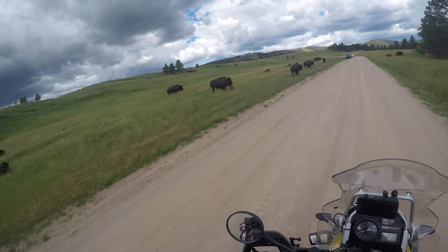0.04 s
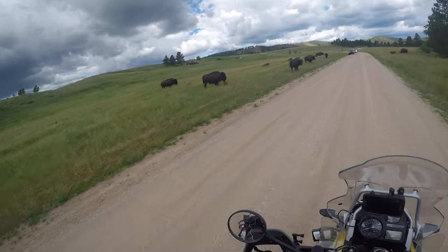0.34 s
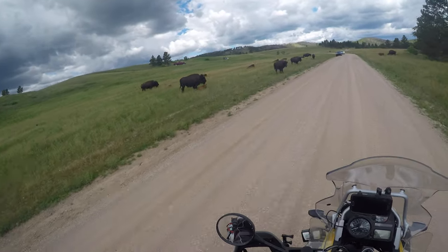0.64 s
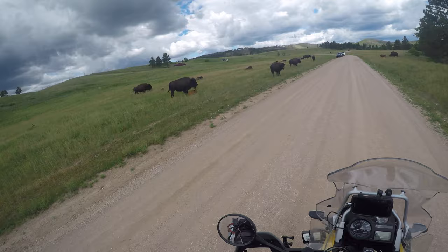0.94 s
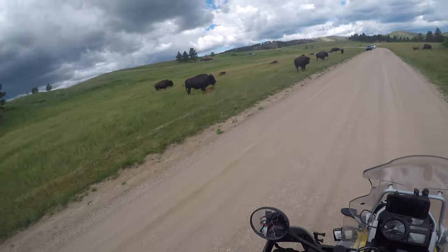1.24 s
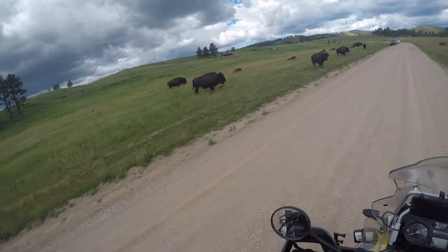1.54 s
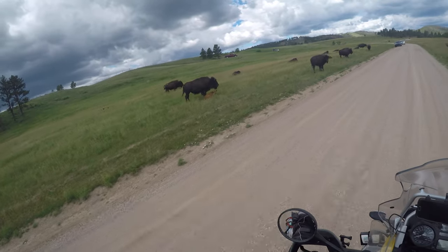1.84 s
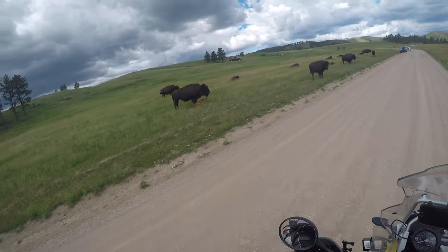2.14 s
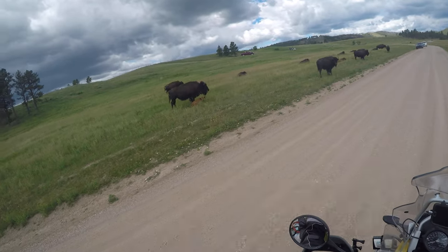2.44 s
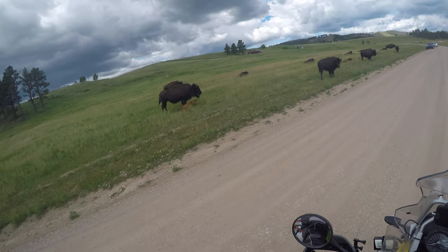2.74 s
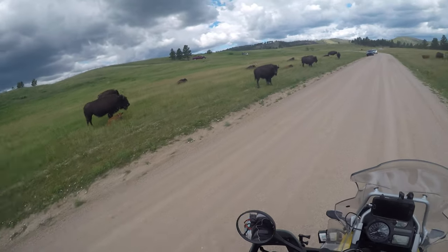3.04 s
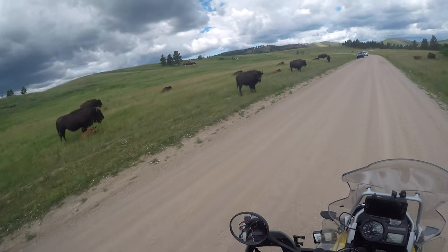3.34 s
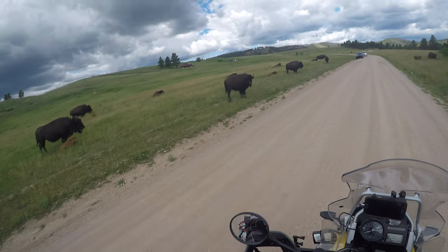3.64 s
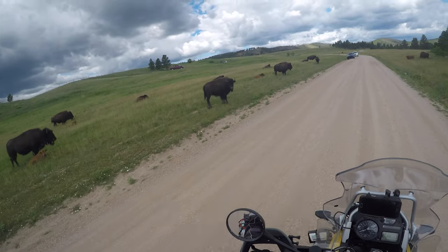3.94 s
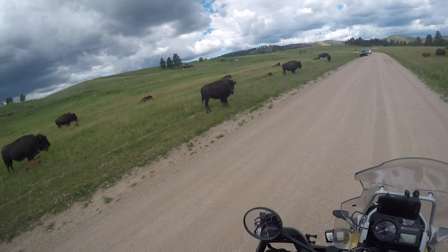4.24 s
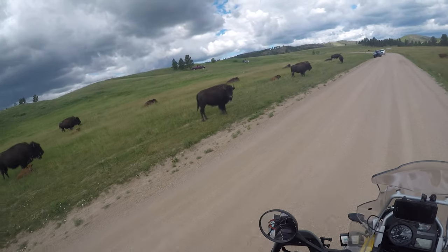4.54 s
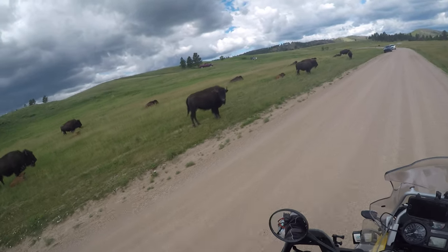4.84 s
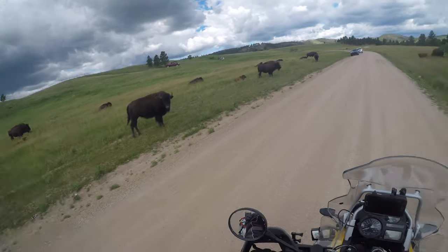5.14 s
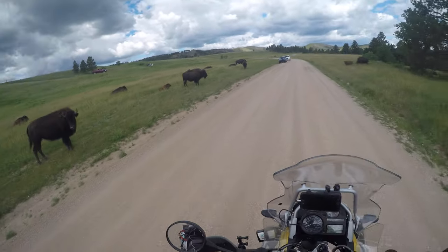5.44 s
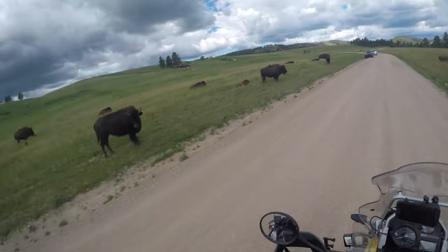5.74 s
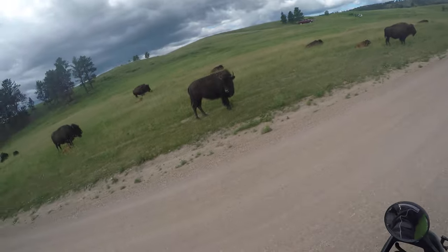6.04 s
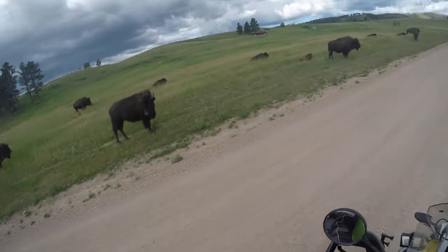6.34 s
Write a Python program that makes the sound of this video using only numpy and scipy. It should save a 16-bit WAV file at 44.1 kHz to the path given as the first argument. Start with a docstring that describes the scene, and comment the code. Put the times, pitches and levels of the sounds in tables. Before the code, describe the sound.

A twin-cylinder motorcycle rides along a gravel road at low revs, heard close from the rider's position for about six and a half seconds. Its exhaust throbs and chuffs throughout, slowly falling in pitch, with a low shudder and thin, slightly ringing valve clatter. A faint gear whine fades by 3 seconds. Low wind buffets the microphone, easing as the bike slows, with gusts at the start and near 2, 3 and 6 seconds. Around 0.7 to 1.1 seconds the tyres crunch over loose gravel and metal parts buzz and chatter; this returns from 3 to 3.8 seconds and around 5.4. A deep bump thuds at 2 seconds. Stray stones tick against the bike near 1.3, 3, 4.8 and 5.2 seconds. From 5.7 to 6.4 seconds a flurry of stone hits and knocks sounds over the still-running engine.

```python
"""A twin-cylinder motorcycle rolls down a gravel road at low revs, slowly losing speed. From the start
the exhaust throbs and chuffs, valves clatter, gears whine faintly, the bike shudders and air buffets
the rider's camera, whose case rings in the mids and treble. Within a second the tyres crunch into the
first patch of loose gravel and set buzzing metal parts chattering. A bump thuds at 2 s, stray stones
knock against the bike, and near 6 s a stony stretch brings a flurry of hits."""
import sys
import numpy as np
from scipy import signal
from scipy.fft import rfft, irfft
from scipy.io import wavfile

SR = 44100
rng = np.random.default_rng(int(sys.argv[2]) if len(sys.argv) > 2 else 0)


def dump(signal):
    """Clip the signal to [-1, 1] and save it as 16-bit WAV at the path in sys.argv[1]."""
    limited = np.clip(np.atleast_2d(signal).T, -1, 1)
    pcm = np.round(limited * 32767).astype(np.int16)
    wavfile.write(sys.argv[1], SR, pcm)


N = 286209
TIME, HZ = np.arange(N) / SR, np.fft.rfftfreq(N, 1 / SR)
CRUISE_CYCLES_PER_S = 13

# The engine winding down. Each row: time in seconds, four-stroke cycles per second.
ENGINE_SPEED = [(0.0, 14.258), (0.5, 14.093), (1.0, 13.863), (1.5, 13.475), (2.0, 13.198), (2.5, 12.922),
                (3.0, 12.596), (3.5, 12.293), (4.0, 12.019), (4.5, 11.939), (5.0, 11.881), (5.5, 11.752),
                (6.0, 11.726), (6.49, 11.623)]
# The voice of the exhaust pipes. Each row: frequency in Hz, relative level of a harmonic there in dB.
PIPE_RESPONSE = [(12, -61.5), (28, -48), (49, -34), (72, -49), (84, -45.5), (97, -37.5), (112, -40),
                 (121, -48), (140, -65.5), (165, -90.5), (195, -66.5), (225, -56.5), (258, -63.5),
                 (330, -74.5)]
# Engine load pushing the exhaust's drone and bark. Each row: time in seconds, lift in dB.
ENGINE_LOAD = [(0, 0.5), (4.6, -0.5), (5.3, 0.6), (6.49, 1.5)]
# Brief dips in the low end. Each row: middle in seconds, length in seconds, depth in dB.
BASS_SAGS = [(1.375, 0.55, 10), (3.58, 0.51, 15), (3.978, .16, 30), (5.737, 0.25, 6)]
# The valve rhythm. Each row: place in the cycle from 0 to 1, half-width in cycles, relative level in dB.
VALVE_BEATS = [(0.96, 0.092, -1), (0.28, 0.097, -1.5), (0.43, 0.095, -7), (0.78, 0.072, -3.5)]
# The tone of the valve clatter. Each row: frequency in Hz, relative level in dB.
CLATTER_EQ = [(100, -43), (230, 20.5), (400, 5.5), (700, 0.5), (1200, 3), (2300, 3.5), (3400, 0.5),
              (6000, -7), (8500, -6.5), (15000, -14.5)]
# Resonances of the camera case. Each row: frequency in Hz, width in Hz, boost in dB.
CASE_RESONANCES = [(434.5, 58, 5.5), (939, 256, 10), (1223, 41, 6), (1470, 440, 5.5), (2063, 64, 5),
                   (2655, 460, 2.5), (2894, 173, 7), (2984, 24, 12.5), (3596, 360, 5), (3830, 130, 3),
                   (4196, 104, 9), (4493, 586, 12.5), (4807, 150, 9.5), (5437, 990, 10.5), (6000, 172, 6),
                   (6500, 140, 8), (6866, 230, 9), (7290, 690, 5.5), (8015, 140, 3.5), (9410, 340, 9.5),
                   (10160, 120, 8.5), (10230, 1170, 7.5), (11610, 820, 9.5), (12413, 739, 7),
                   (13700, 160, 9), (14600, 620, 10)]
# The rider looks aside and the clatter brightens. Each row: middle and length in seconds, lift in dB.
RIDER_GLANCES = [(2.15, 1.6, 1), (6.25, .9, 1.2)]
# The fade of the gear whine. Each row: time in seconds, relative level in dB.
WHINE_FADE = [(0, -63.5), (1.5, -62.5), (2.8, -74), (6.49, -77)]
# The tone of air on the microphone. Each row: frequency in Hz, relative level in dB.
WIND_EQ = [(5, -18), (12, -22), (18, -1), (27, -4.5), (37, -3.5), (55, -4.5), (75, -20.5), (120, -29.5),
           (200, -38), (400, -72), (1000, -84)]
# Gusts on the microphone. Each row: middle in seconds, length in seconds, level in dB.
WIND_GUSTS = [(0.105, 0.36, -34), (.95, 0.4, -40), (2.04, 0.23, -28.5), (3.108, 0.19, -34),
              (5.3, 0.31, -49), (6.068, .22, -32)]
# The tone of the tyres' dull roar. Each row: frequency in Hz, relative level in dB.
ROAR_EQ = [(40, -20), (90, 21), (160, 14.5), (260, 9.5), (350, -0.5), (600, 1.5), (1000, -8.5), (1600, -16),
           (3000, -20), (8000, -70)]
# The tone of the gravel's crunch. Each row: frequency in Hz, relative level in dB.
CRUNCH_EQ = [(300, -13.5), (900, -13.5), (1400, -4), (1800, 2), (2300, -4.5), (3200, -12), (5000, -27),
             (12000, -42)]
# Loose gravel. Each row: middle and length in seconds, relative levels of roar and of crunch in dB.
GRAVEL_PATCHES = [(.73, 0.31, -60.5, -59), (1.067, 0.34, -61.5, -57.5), (2.144, 0.4, -56.5, -67),
                  (2.99, 0.22, -56, -54.5), (3.257, 0.3, -55, -61.5), (3.758, 0.1, -57.5, -60),
                  (4.517, 0.17, -65, -61.5), (5.42, 0.37, -55.5, -59), (5.83, 0.39, -55, -71)]
# The ring of three loose metal parts. Each row: pitch in Hz, width in Hz.
PART_RINGS = [(1675, 108), (2660, 117), (2900, 330)]
# Where each part buzzes most. Each row: engine speed and reach in cycles per second, relative level in dB.
PART_BUZZ = [(12.87, 0.64, -61), (14.3, 0.92, -61), (12.1, 0.21, -60)]
# The road jolts a part. Each row: middle and length in seconds, part from 0 to 2, relative level in dB.
PART_CHATTERS = [(0.772, 0.17, 0, -55), (1.036, .12, 0, -57), (1.57, 0.11, 0, -63), (2.954, 0.19, 0, -56.5),
                 (3.23, 0.14, 0, -60), (3.752, 0.062, 0, -55), (5.416, .3, 0, -65), (5.46, 0.37, 1, -59),
                 (3.2, 0.44, 2, -63.5), (5.44, 0.33, 2, -63.5)]
# Bumps and stone hits. Each row: start in seconds, relative level in dB, pitch in Hz, ring width in Hz.
HITS = [(1.282, -36, 2050, 320), (1.95, -34, 239, 88), (1.981, -27.5, 234, 75), (1.981, -11, 52.2, 9.1),
        (3.019, -38, 1740, 160), (3.207, -35, 1740, 500), (4.762, -39.5, 2090, 640),
        (5.194, -38, 1820, 900), (5.752, -39, 970, 120), (5.78, -39, 950, 220), (5.849, -28, 1390, 1300),
        (5.866, -28, 210, 104), (5.891, -35, 1200, 1900), (5.916, -26.5, 181, 72), (5.959, -32.5, 990, 450),
        (5.992, -30, 800, 1700), (6.055, -24, 1090, 2800), (6.091, -29.5, 168, 52), (6.135, -43.5, 490, 56),
        (6.364, -35.5, 2180, 540)]


def amp(db):
    """Decibels to gain."""
    return 10 ** (np.asarray(db) / 20)


def unit(x):
    """Scales to rms 1."""
    return x / np.sqrt(np.mean(x ** 2) + 1e-20)


def curve(rows):
    """Draws a time table out to every sample."""
    return np.interp(TIME, *np.transpose(rows))


def eq_db(points):
    """Draws a tone table out to dB at every frequency."""
    hz, db = np.transpose(points)
    return np.interp(np.log(HZ + 1), np.log(hz + 1), db)


def shaped(x, db, band_hz):
    """Filters x by a dB curve, scaled to rms 1 within the band."""
    spectrum = rfft(x) * amp(db)
    inside = spectrum[(HZ > band_hz[0]) & (HZ < band_hz[1])]
    return irfft(spectrum, N) * N / np.sqrt(2 * np.sum(abs(inside) ** 2))


def wander(rate_hz):
    """Smooth random drift of rms 1."""
    return unit(irfft(rfft(rng.standard_normal(N)) * np.exp(-(HZ / rate_hz) ** 2), N))


def grains(per_s, spread_db):
    """Random clicks, mostly small and a few large."""
    size = amp(spread_db * np.minimum(rng.exponential(1, N), 4))
    return unit(size * rng.choice([-1, 1], N) * (rng.random(N) < per_s / SR))


def ring(x, hz, width_hz):
    """A steep resonance, scaled to rms 1."""
    pole = np.exp((2j * np.pi * hz - np.pi * width_hz) / SR)
    return unit(signal.lfilter([1], np.poly([pole, pole]), x).real)


def swell(middle, length):
    """Rises, holds and falls around a moment."""
    return np.exp(-abs(2 * (TIME - middle) / length) ** 3)


def swelling(bed_db, events):
    """Gain of a steady bed plus (middle, length, dB) swells, summed in power."""
    swell_power = sum(amp(db) ** 2 * swell(middle, length) for middle, length, db in events)
    return np.sqrt(amp(bed_db) ** 2 + swell_power)


def ride_db(events):
    """A fader ride in dB, made of (middle, length, dB) swells."""
    return sum(db * swell(middle, length) for middle, length, db in events)


def beat(cycles, place, half_width):
    """A short pulse at one place in every engine cycle."""
    return np.exp(-(((cycles - place + .5) % 1 - .5) / half_width) ** 2)


def revs():
    """Engine speed above cruising, in cycles per second."""
    return curve(ENGINE_SPEED) - CRUISE_CYCLES_PER_S


def exhaust(cycles):
    """Two unequal firings a cycle kick the pipes, which ring on; no two cycles are equally strong."""
    speed, orders = curve(ENGINE_SPEED), np.arange(1, 25)
    levels_db = np.array([np.interp(k * speed, *np.transpose(PIPE_RESPONSE)) for k in orders])
    # odd harmonics come from the cylinders' imbalance, which is greatest in the bark
    levels_db += (np.where(orders < 10, -10, -5.5) * (orders % 2))[:, None]
    typical_db = np.median(levels_db, axis=1)
    mirrored_db = np.r_[typical_db[0], typical_db, typical_db[-2::-1]]
    phases = -signal.hilbert(np.log(amp(mirrored_db))).imag[1:]  # minimum phase: sharp attack, then ring
    harmonics = [-np.sqrt(2) * amp(db) * np.cos(2 * np.pi * k * cycles + phase)
                 for k, db, phase in zip(orders, levels_db, phases)]
    throb = sum(harmonics[:3]) * amp(-10 - 3 * revs())  # grows as the revs fall
    boom = harmonics[3] * amp(1.5)  # twice the firing rate
    drone = sum(harmonics[4:10])
    bark = sum(harmonics[10:]) * amp(-1 + wander(6.8))
    low_end = (throb + boom) * amp(1.06 * wander(14) - ride_db(BASS_SAGS))
    return low_end + (drone + bark) * amp(curve(ENGINE_LOAD))


def chuff(cycles, level_db=-53.5):
    """A dull puff of gas once a cycle, just ahead of the stronger firing."""
    gas = ring(rng.standard_normal(N), hz=377, width_hz=256)
    return gas * beat(cycles, place=0.923, half_width=0.048) * amp(level_db)


def camera_case_db():
    """The camera case rings in the mids and treble: its boost in dB at every frequency."""
    return sum(db * np.exp(-(2 * (HZ - hz) / width) ** 2) for hz, width, db in CASE_RESONANCES)


def valve_clatter(cycles, hiss_power=0.8, top_hz=8500):
    """Valves and pistons tick at set places in the cycle, over a steady mechanical hiss."""
    beats = sum(amp(db) * beat(cycles, place, half_width) for place, half_width, db in VALVE_BEATS)
    beats *= amp(1.7 * wander(30))
    pulsing_noise = np.sqrt(hiss_power + beats ** 2) * rng.standard_normal(N)
    clatter = shaped(pulsing_noise, eq_db(CLATTER_EQ) + camera_case_db(), band_hz=(3560, 13800))
    clatter *= amp(-58.5 + revs())
    top_end = irfft(rfft(clatter) * (1 - np.exp(-(HZ / top_hz) ** 2)), N)
    return clatter + top_end * (amp(ride_db(RIDER_GLANCES)) - 1)


def gear_whine(cycles, teeth_per_cycle=50.2, trim_db=-1.5):
    """Meshing teeth sing a faint, broken, slightly wavering tone."""
    gain = amp(curve(WHINE_FADE) + trim_db + 1.5 * wander(8.9))
    return gain * np.sin(2 * np.pi * teeth_per_cycle * cycles + 0.76 * wander(36))


def shudder(sag_share=0.33):
    """The road shakes the bike near the pitch of the exhaust's boom, so the two surge against each other."""
    rumble = ring(rng.standard_normal(N), hz=53.9, width_hz=23.5)
    return rumble * amp(-41 - sag_share * ride_db(BASS_SAGS))


def wind():
    """Lumpy low pressure on the microphone: it comes in gusts and eases as the bike slows."""
    buffeting = shaped(rng.standard_normal(N), eq_db(WIND_EQ), band_hz=(13, 45))
    return buffeting * swelling(bed_db=-41.5 + 4.2 * revs(), events=WIND_GUSTS)


def tyres(roar_trim_db=-4, crunch_trim_db=-2.5):
    """Countless grains under the tyres: a dull roar and a brighter crunch, swelling on loose gravel."""
    case_db = camera_case_db()
    roar = shaped(grains(per_s=6000, spread_db=2.23), eq_db(ROAR_EQ) + case_db, band_hz=(452, 868))
    crunch = shaped(grains(per_s=2800, spread_db=2.1), eq_db(CRUNCH_EQ) + case_db, band_hz=(1506, 2230))
    roar *= swelling(-60.5, [(middle, length, db) for middle, length, db, _ in GRAVEL_PATCHES])
    crunch *= swelling(-62.5, [(middle, length, db) for middle, length, _, db in GRAVEL_PATCHES])
    return roar * amp(roar_trim_db + 1.55 * wander(42)) + crunch * amp(crunch_trim_db + 2.83 * wander(42))


def rattle(cycles, bed_db=-71, trim_db=-1):
    """Loose metal parts each buzz near one engine speed and chatter on rough ground, never quite still."""
    angle = 2 * np.pi * (cycles - 0.24)
    firing_db = 4 * np.cos(2 * angle) + 1.5 * np.cos(angle)  # two shakes a cycle, one harder
    out = np.zeros(N)
    for k, ((hz, width_hz), (buzz_speed, reach, buzz_db)) in enumerate(zip(PART_RINGS, PART_BUZZ)):
        buzz = amp(buzz_db) * np.exp(-((curve(ENGINE_SPEED) - buzz_speed) / reach) ** 2)
        jolts = [(middle, length, db) for middle, length, part, db in PART_CHATTERS if round(part) == k]
        shake = amp(firing_db + wander(25))
        taps = grains(per_s=2500, spread_db=0.3) * shake
        out += ring(taps, hz, width_hz) * np.hypot(buzz, swelling(bed_db, jolts))
    return out * amp(trim_db)


def knocks(trim_db=-6, fairing_hz=4500):
    """Bumps and stones strike short bursts that ring in whatever was hit; the fairing dulls the top."""
    out, t = np.zeros(N), np.arange(SR // 2) / SR
    for start, db, hz, width_hz in HITS:
        decay_s = 0.0032 * (690 / width_hz) ** 0.68  # narrower rings last longer
        attack = 1 - np.exp(-2 * hz * t)  # higher rings speak faster
        envelope = attack * np.exp(-t / decay_s)
        burst = envelope * ring(rng.standard_normal(len(t)), hz, width_hz)
        burst *= np.linalg.norm(envelope) / np.linalg.norm(burst)  # the blow sets the energy
        slot = out[round(start * SR):][:len(t)]
        slot += amp(db + trim_db) * burst[:len(slot)]
    return signal.lfilter(*signal.butter(2, fairing_hz, fs=SR), out)


def scene():
    """The mono mix: the crank keeps time for the engine layers, with road and air around them."""
    cycles = np.cumsum(curve(ENGINE_SPEED)) / SR
    first_firing = 0.965  # place in the cycle
    engine = exhaust(cycles - first_firing) + chuff(cycles) + valve_clatter(cycles) + gear_whine(cycles)
    return (engine + shudder() + wind() + tyres() + rattle(cycles) + knocks())[None]


def record(dry, edge_hz=15250):
    """The camera's band limit shaves off the very top."""
    lowpass = signal.firwin(511, edge_hz, window=("kaiser", 9), fs=SR)
    return signal.oaconvolve(dry, lowpass[None], "same", axes=1)


dry = scene()
out = record(dry)
dump(out)
```